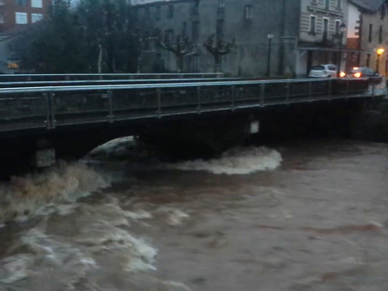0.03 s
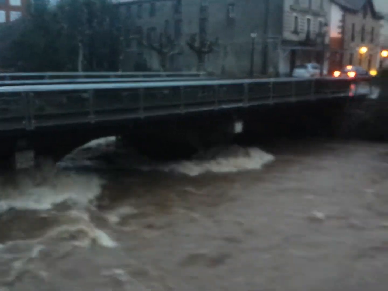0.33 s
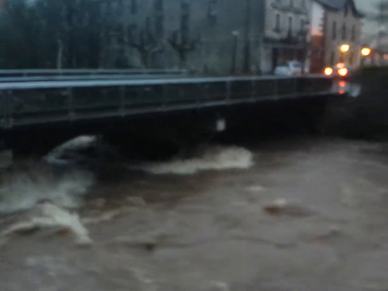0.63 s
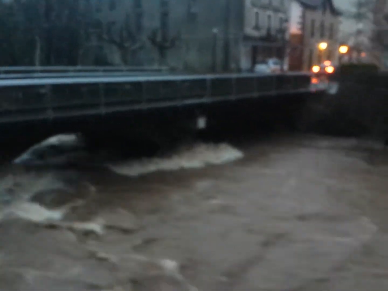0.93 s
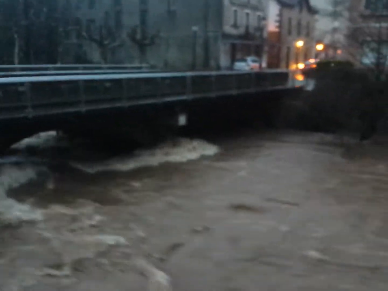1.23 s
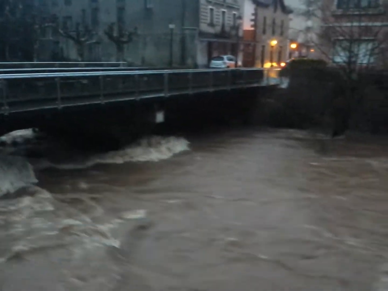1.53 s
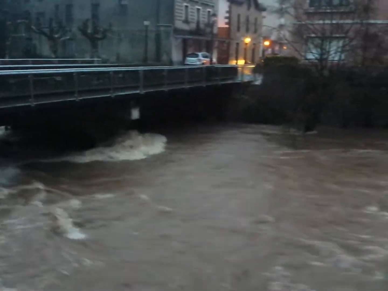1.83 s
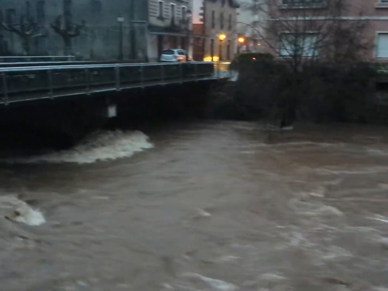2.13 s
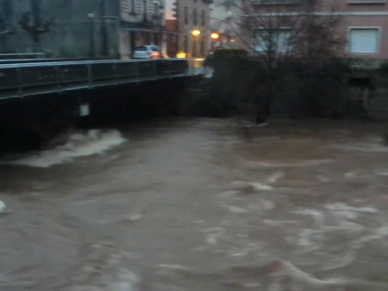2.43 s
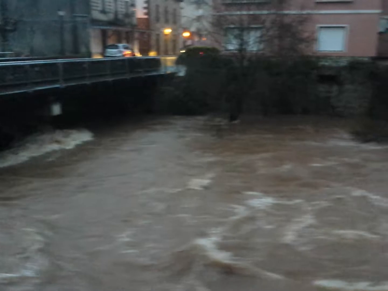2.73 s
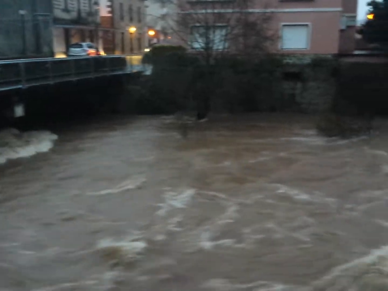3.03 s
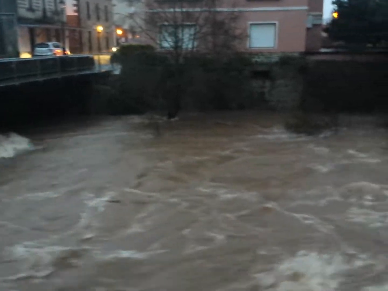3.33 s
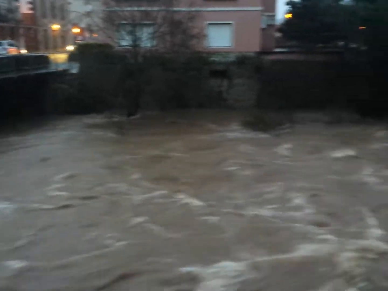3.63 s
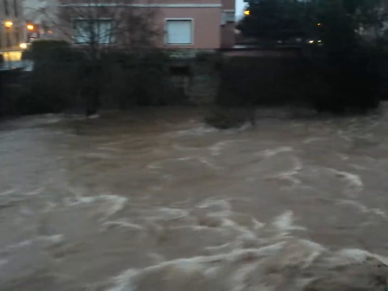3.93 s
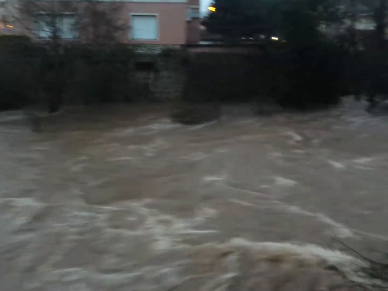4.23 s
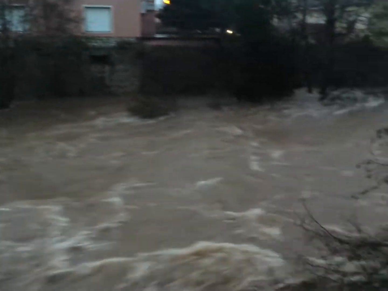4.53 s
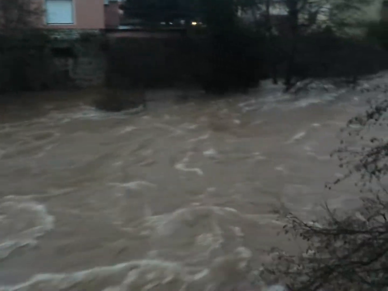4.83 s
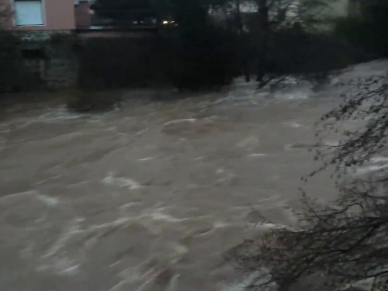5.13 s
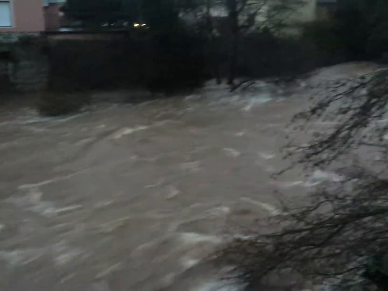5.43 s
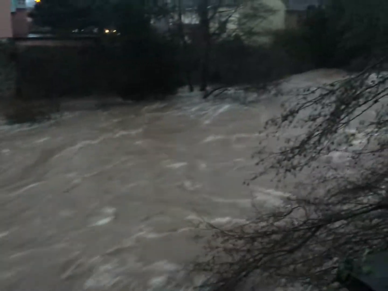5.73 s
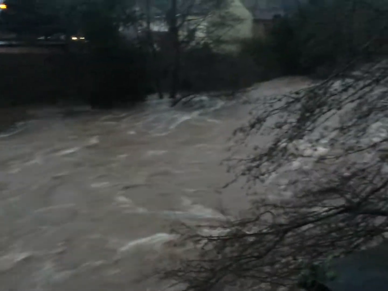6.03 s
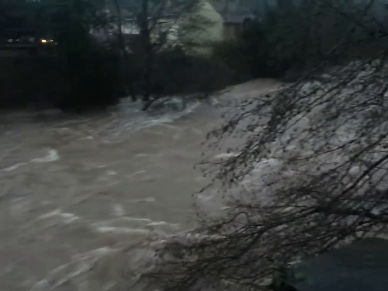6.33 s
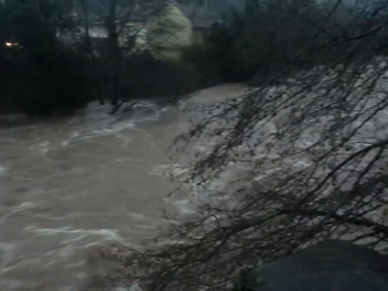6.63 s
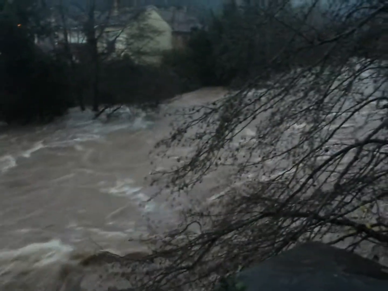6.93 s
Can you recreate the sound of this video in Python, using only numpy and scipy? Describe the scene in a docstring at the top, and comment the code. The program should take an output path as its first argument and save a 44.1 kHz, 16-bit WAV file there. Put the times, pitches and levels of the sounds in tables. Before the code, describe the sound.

A flooded river roars and churns steadily, with hissing foam, bubbling and small slaps of breaking waves.

```python
"""The roar of a river in flood, with a flurry of wave slaps on top, heard from the bank by a bridge.
Countless bubbles ring in the churn, foam hisses, drops tick, and waves break, slap and gulp on trapped air.
The listener turns downstream and the colour shifts. Two microphone ports a hand's length apart each add
a bright treble resonance, and puffs of air rumble faintly on them."""
import sys
import numpy as np
from scipy import signal
from scipy.fft import rfft, irfft, next_fast_len
from scipy.io import wavfile
from scipy.ndimage import map_coordinates

SR = 44100
rng = np.random.default_rng(int(sys.argv[2]) if len(sys.argv) > 2 else 0)


def unload_wav(signal):
    """Save mono or channel-first audio to the path in sys.argv[1] as 16-bit WAV at rate SR, clipped to [-1, 1]."""
    wavfile.write(
        sys.argv[1],
        SR,
        np.round(np.clip(np.atleast_2d(signal).T, -1, 1) * 32767).astype(np.int16),
    )


N = 312228
TIME = np.arange(N) / SR
SIZE = next_fast_len(N)
HZ = np.maximum(np.arange(SIZE // 2 + 1) * SR / SIZE, 1)

# the listener's turn: t/s, heading (0 at the bridge, 1 downstream)
HEADING = [(0, 0), (2.3, 0.076), (3.7, 0.33), (5, 1), (7.08, 0.84)]
# how close the standing waves by the bank sound: t/s, their share of the lows (0-1)
WAVE_NEARNESS = [(0, 0.23), (.8, 0.13), (1.8, 0.19), (2.6, 0.08), (3.9, 0.07), (5.2, 0.23), (5.8, 0.31),
                 (7.08, 0.4)]


def from_db(db):
    """Decibels to gain."""
    return np.exp(np.asarray(db) * (np.log(10) / 20))


def rms_one(x):
    """Scale to unit power."""
    return x / np.sqrt(np.mean(x ** 2) + 1e-20)


def in_time(points):
    """An automation curve, read at every sample."""
    return np.interp(TIME, *np.transpose(points))


def with_turn(at_bridge, downstream):
    """Crossfade two values or signals as the listener turns."""
    return at_bridge + (downstream - at_bridge) * in_time(HEADING)


def bell(s, half_length):
    """A smooth swell of height 1 around a moment."""
    return np.cos(np.pi / 2 * np.clip((TIME - s) / half_length, -1, 1)) ** 2


def drift(rate):
    """Smooth random modulation of spread 1, changing about rate times a second."""
    step, run_in = 40, 2000
    pole = np.exp(-2 * np.pi * rate * step / SR)
    slow = signal.lfilter([1], [1, -2 * pole, pole * pole], rng.standard_normal(N // step + run_in + 2))
    slow = rms_one(slow[run_in:])
    return np.interp(np.arange(N) / step, np.arange(len(slow)), slow)


def colour(x, gain):
    """EQ with a gain for every frequency of HZ."""
    return irfft(rfft(x, SIZE) * gain, SIZE)[..., :N]


def resonate(x, peaks):
    """EQ with a table of peaks and notches."""
    return colour(x, from_db(sum(db / (1 + (2 * (HZ - hz) / width) ** 2) for hz, width, db in peaks)))


def swell(water, lift_db, hz, width_hz):
    """Ride the level of one band."""
    return water + (from_db(lift_db) - 1) * colour(water, 1 / (1 + (2 * (HZ - hz) / width_hz) ** 4))


def breeze(level_db, gust_db, top_hz):
    """Light air buffets each port: a faint, lumpy rumble that swells with every puff."""
    # puffs of air: t/s, half-length/s, lift/dB
    puffs = [(0, 0.15, 11), (.3, .18, 8), (.68, .12, 7), (.88, .14, 7), (2.7, .25, 8), (5.38, .1, 6),
             (5.66, .1, 6)]
    rumble = colour(rng.standard_normal((2, N)), HZ / (HZ + 15) / (1 + (HZ / top_hz) ** 3))
    puffs_db = sum(db * bell(s, length) for s, length, db in puffs)
    return from_db(level_db + puffs_db) * rms_one(rumble * from_db(gust_db * drift(5.8)))


def droplets(per_s, gain_db, size_db, low_cut_hz):
    """Thrown drops tick on the surface at random."""
    falls = (rng.random((2, N)) < per_s / SR) * rng.choice([-1, 1], (2, N))
    ticks = falls * from_db(gain_db + size_db * rng.uniform(-1, 1, (2, N)))
    return signal.sosfilt(signal.butter(1, low_cut_hz, "high", fs=SR, output="sos"), ticks + 1e-18)


def top_lift(water):
    """The very top of the treble brightens briefly."""
    # treble lifts: t/s, half-length/s, lift/dB
    lifts = [(3.2, 1.0, 2), (4.45, .2, 2)]
    return swell(water, sum(db * bell(s, length) for s, length, db in lifts), hz=13400, width_hz=2600)


def gulps(water):
    """A wave folds over a pocket of air, which resonates: the water swells briefly at its pitch."""
    # air pockets: t/s, half-length/s, f/Hz, lift/dB
    pockets = [(4.23, .06, 350, 3), (4.39, .06, 400, 3), (4.59, .08, 420, 3), (4.667, 0.049, 457, 6.5),
               (6.54, .05, 493, 5)]
    for s, length, hz, db in pockets:
        water = swell(water, db * bell(s, length), hz, width_hz=220)
    return water


def slaps(gain_db, decay_s, spread, smack):
    """A crest falls back on the water: a click and a short burst, low for a plash, high for a spatter."""
    # falling crests: t/s, relative level/dB, centre f/Hz
    hits = [(0.0785, -1, 4000), (0.198, 6.5, 1450), (0.260, 2, 1900), (0.2934, -2, 3500),
            (0.4915, -5, 7000), (0.9154, -3, 6000), (1.287, 0, 3000), (2.233, -2, 3800), (3.627, -2, 1900),
            (4.479, 2.5, 1800), (4.940, -1, 6000), (4.996, -1.5, 3800), (5.567, -2, 2200),
            (5.888, -14, 6500), (6.581, 0, 7000), (6.884, -7, 6000), (7.036, 0.5, 3900)]
    out, t = np.zeros((2, N)), TIME[:SR // 20]
    for s, db, hz in hits:
        band = signal.butter(1, [hz / spread, min(hz * spread, .45 * SR)], "band", fs=SR, output="sos")
        impact = smack * (t == 0) + np.exp(-t / decay_s) * rng.standard_normal(len(t))
        start = round(s * SR)
        out[:, start:start + len(t)] += from_db(db + gain_db) * signal.sosfilt(band, impact)[:N - start]
    return out


def bank_reflection(water, width_hz):
    """The bank's reflection scoops out a narrow band that glides as the ports turn."""
    centre_hz = [with_turn(530, 700), with_turn(476, 510)]   # left, right
    depth_db = with_turn(-5, -2.5)
    carrier = np.exp(2j * np.pi * np.cumsum(centre_hz, axis=1) / SR)
    narrow = signal.butter(1, width_hz / 2, fs=SR, output="sos")
    band = 2 * np.real(signal.sosfilt(narrow, water / carrier) * carrier)
    return water - (1 - from_db(depth_db)) * band


def ring(clicks, hz, t60):
    """Each click sets a bubble ringing as a decaying sine."""
    pole, angle = from_db(-60 / (t60 * SR)), 2 * np.pi * hz / SR
    return signal.lfilter([0, np.sin(angle)], [1, -2 * pole * np.cos(angle), pole * pole], clicks + 1e-18)


def churn(per_s, size_db, cycles, bubble_share):
    """Broken water with a flat spectrum: near bubbles ring singly over the wash of the far ones."""
    pitches = np.geomspace(350, 9000, 24)
    born = np.flatnonzero(rng.random(N) < per_s * from_db(1.6 * drift(7)) / SR)   # bubbles come in clouds
    sizes = from_db(size_db * np.minimum(rng.exponential(1, N), 4)) * rng.choice([-1, 1], N)
    pitch_index = rng.integers(0, len(pitches), N)
    bubbles = np.zeros(N)
    for k, (hz, width) in enumerate(zip(pitches, np.gradient(pitches))):
        clicks, own = np.zeros(N), born[pitch_index[born] == k]
        clicks[own] = sizes[own]
        bubbles += rms_one(ring(clicks, hz, cycles / hz)) * np.sqrt(2 * width / SR)
    bubble_band = 1 / (1 + (pitches[0] / HZ) ** 4) / (1 + (HZ / pitches[-1]) ** 8)
    wash = colour(rng.standard_normal(N), np.sqrt(1 - bubble_share * bubble_band))
    return np.sqrt(bubble_share) * bubbles + wash


def far_river(port_spacing_s):
    """Water from all sides: mono in the bass, wide where wavelengths are shorter than the port spacing."""
    alike = np.sinc(2 * HZ * port_spacing_s)
    mid, side = [churn(per_s=9000, size_db=3.5, cycles=11.8, bubble_share=0.24) for _ in range(2)]
    return colour(mid, np.sqrt((1 + alike) / 2)) + colour(side, np.sqrt((1 - alike) / 2)) * [[1], [-1]]


def near_waves(delay_s):
    """Standing waves by the bank bubble from one side and reach the left port late."""
    waves = churn(per_s=3000, size_db=4.5, cycles=19.0, bubble_share=0.75)
    return np.array([map_coordinates(waves, [(TIME - delay_s) * SR], order=3, mode="nearest"), waves])


def breakers():
    """Waves heave up and break: level rides in dB for the low roar, mid rush and foam hiss."""
    # breaking waves: t/s, half-length/s, roar/dB, rush/dB, hiss/dB
    waves = [(0.284, 0.16, 4, 0.9, 0), (.515, 0.045, 4.2, 0, 0.5), (0.666, 0.053, 7, 0.5, 0.9),
             (0.79, .06, 4.5, 0, .7), (1.03, 0.14, 4.5, 0, 0.3), (2.105, 0.15, 3.8, 0.5, 0.5),
             (2.31, 0.2, 2, 1.3, 0), (2.6, 0.23, 3, 1, 0.2), (3.0, 0.49, .7, 1.4, 1.0),
             (3.624, 0.094, 3.5, 1, 0), (4.046, .1, 0, 1, -0.7), (4.398, 0.18, 0.5, 1, 0.5),
             (4.622, 0.21, 1, 1.8, 1), (5.58, 0.12, 1.5, -0.5, 1.5), (6.49, 0.17, 2.5, 1, 1.0),
             (7.06, .15, 1.5, 0.4, 0.5)]
    return sum(np.outer(lifts_db, bell(s, length)) for s, length, *lifts_db in waves)


def register_levels():
    """Roar, rush and hiss in dB: nearness adds body, breakers swell, the turn pans the hiss left."""
    near, heading = [curve - curve.mean() for curve in (in_time(WAVE_NEARNESS), in_time(HEADING))]
    roar_lift, rush_lift, hiss_lift = breakers()
    roar = -0.5 + 8.5 * near + roar_lift
    rush = -0.16 + 11.5 * near + rush_lift
    hiss = -0.31 - near + hiss_lift + np.outer((0.5, -0.86), heading)
    return roar, rush, hiss


def surge(water, flutter_db, crest_db, wander_db):
    """The flow swells and sinks: eddies stir each octave, small crests lift the upper ones together."""
    roar, rush, hiss = register_levels()
    spectrum, log_hz, octaves = rfft(water, SIZE), np.log2(HZ), np.log2(120) + np.arange(7)
    crests, out = drift(16), 0
    for octave, own in zip(octaves, np.eye(len(octaves))):
        low = np.interp(octave, np.log2([230, 480]), [1, 0])
        high = np.interp(octave, np.log2([2400, 5500]), [0, 1])
        level = low * roar + (1 - low - high) * rush + high * hiss
        eddies = flutter_db * drift(10.6) + wander_db * (1 - high) * drift(5.2)
        band = irfft(spectrum * np.interp(log_hz, octaves, own), SIZE)[:, :N]
        out = out + band * from_db(level + eddies + crest_db * (1 - low) * crests)
    return out


def river():
    """The main bed: in the lows and mids the near waves take over a share of the far water."""
    share, lows = in_time(WAVE_NEARNESS), 1 / (1 + (HZ / 2100) ** 3)
    far = far_river(port_spacing_s=0.0005)
    far = far - (1 - np.sqrt(1 - share)) * colour(far, lows)
    near = colour(near_waves(delay_s=with_turn(0.00024, 0.00032)), np.sqrt(lows))
    return far + np.sqrt(share) * near


def scene():
    """The surging river and its splashes share one EQ; the breeze sits underneath."""
    # the tone of the water: f/Hz, level/dB
    tone = [(20, -46), (42, -28), (70, -16), (125, -10), (195, -6), (400, -8), (560, -10.5), (780, -9.5),
            (1200, -13.5), (2600, -17.5), (4000, -17.5), (9000, -17), (11800, -21), (14000, -34)]
    water = bank_reflection(river(), width_hz=197)
    water = surge(water, flutter_db=0.5, crest_db=0.21, wander_db=0.54)
    water = top_lift(gulps(water))
    water = swell(water, -1.2 * bell(1.75, .65), hz=3300, width_hz=1700)   # a lull between two surges
    water += slaps(gain_db=3.5, decay_s=0.0041, spread=1.6, smack=3.5)
    water += droplets(per_s=14, gain_db=9.5, size_db=4.0, low_cut_hz=1000)
    tone_hz, tone_db = np.transpose(tone)
    eq_db = np.interp(np.log(HZ), np.log(tone_hz), tone_db) - 0.27
    return colour(water, from_db(eq_db)) + breeze(level_db=-57.0, gust_db=-4.0, top_hz=60)


def channel(x, peaks, turn_peaks, cutoff_hz, steepness, ceiling=0.85):
    """One channel: its port's resonances, shifting with the turn, then a soft clip and a steep low-pass."""
    x = resonate(x, peaks)
    x = with_turn(x, resonate(x, turn_peaks))
    x = x / (1 + (x / ceiling) ** 8) ** (1 / 8)
    return colour(x, 1 / np.sqrt(1 + (HZ / cutoff_hz) ** steepness))


def dips(edge_s):
    """A level ride in dB that sinks, holds and recovers a few times."""
    # dips in level: start t/s, end t/s, level/dB
    spans = [(.45, 0.56, -0.5), (1.11, 2.102, -1.2), (1.13, 1.158, -2.5), (4.8, 4.878, -0.4)]
    return sum(db * (np.tanh((TIME - start) / edge_s) - np.tanh((TIME - end) / edge_s)) / 2
               for start, end, db in spans)


def record(dry):
    """Two ports pick up the river; the left channel is quieter and is low-passed lower, so it is duller."""
    # each port's resonances and notches: f/Hz, width/Hz, level/dB
    left_peaks = [(1870, 1110, 11), (2210, 350, -11), (2800, 1400, 0.8), (5100, 3500, 5),
                  (6260, 1980, 12.5), (9600, 3300, -1.5)]
    right_peaks = [(5040, 1700, 0.7), (6730, 710, 2.1), (6820, 3570, 11.06)]
    # colour added when facing downstream: f/Hz, width/Hz, level/dB
    left_turned = [(1620, 240, 1), (1950, 300, 0), (2700, 610, 2.2), (4080, 1100, -2), (8500, 2500, 2)]
    right_turned = [(770, 240, -1.6), (1070, 140, 2.2), (5000, 500, 1.3), (6000, 500, -1.1)]
    left, right = dry * from_db(dips(edge_s=0.011))
    return np.array([channel(left * from_db(-6.5), left_peaks, left_turned, cutoff_hz=10500, steepness=60),
                     channel(right, right_peaks, right_turned, cutoff_hz=14520, steepness=600)])


dry = scene()
out = record(dry)
unload_wav(out)
```